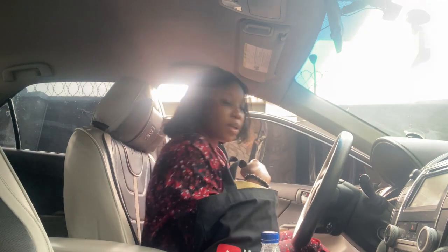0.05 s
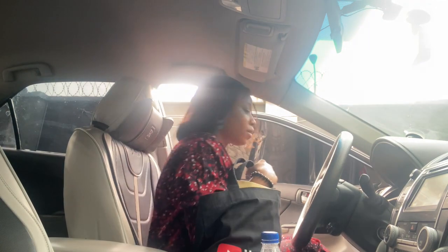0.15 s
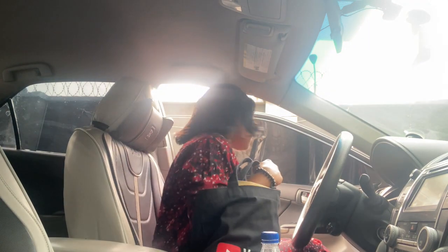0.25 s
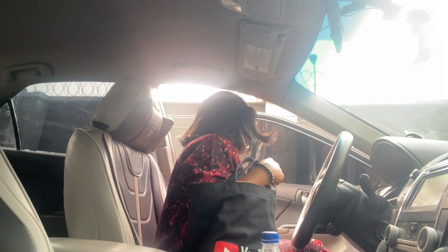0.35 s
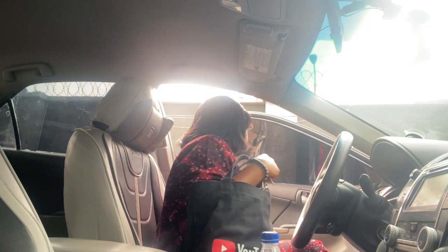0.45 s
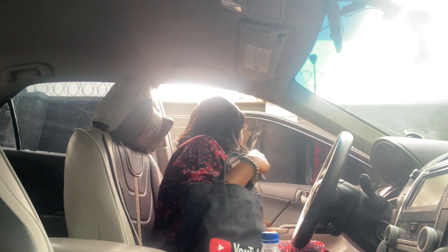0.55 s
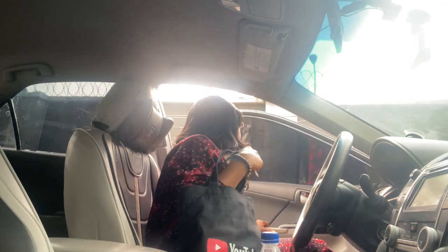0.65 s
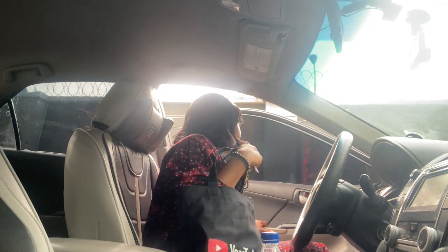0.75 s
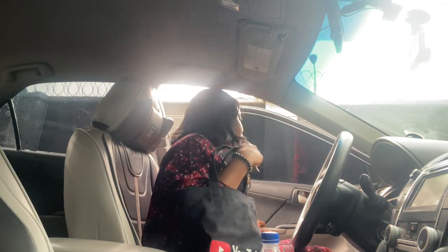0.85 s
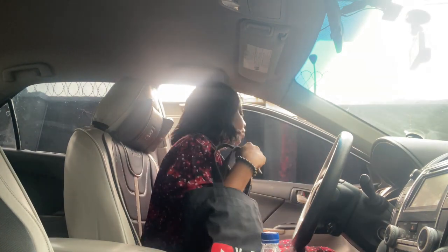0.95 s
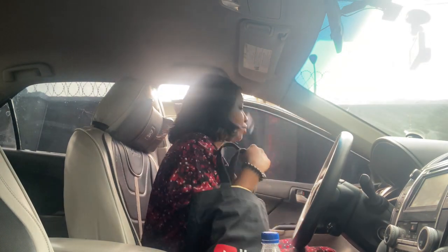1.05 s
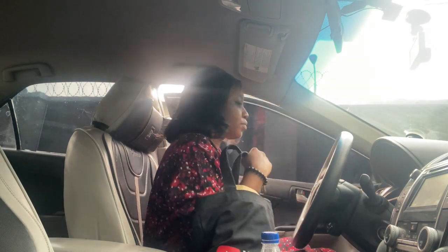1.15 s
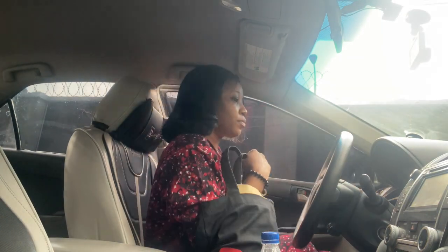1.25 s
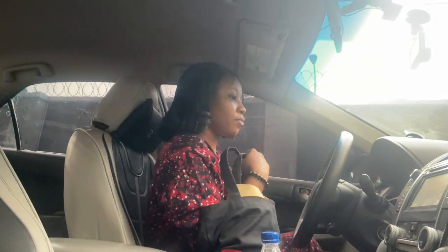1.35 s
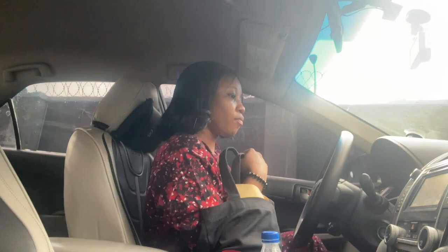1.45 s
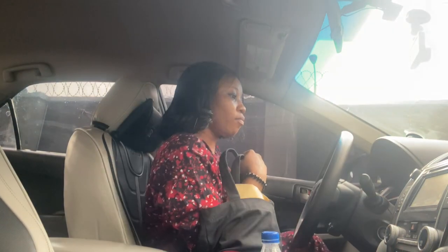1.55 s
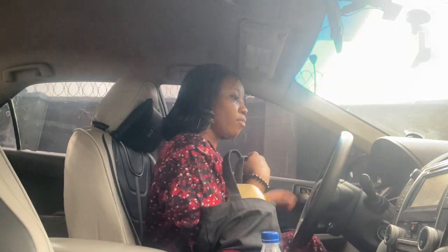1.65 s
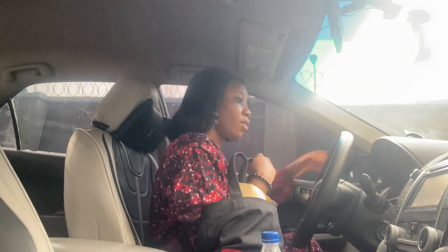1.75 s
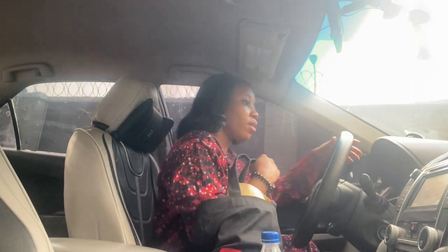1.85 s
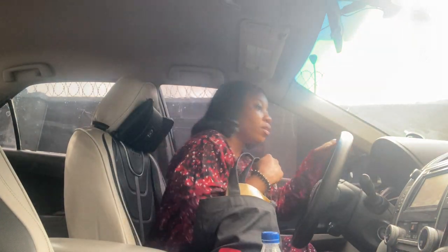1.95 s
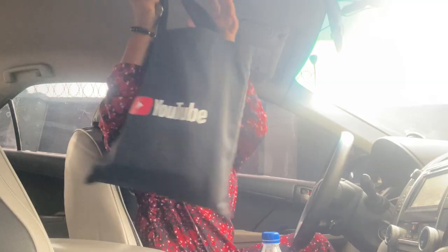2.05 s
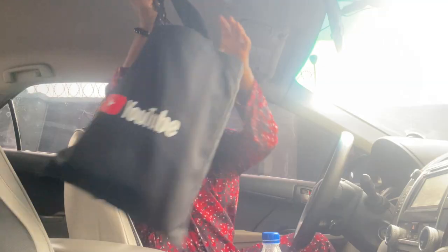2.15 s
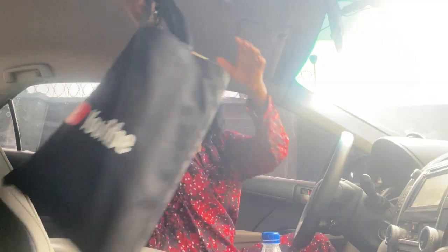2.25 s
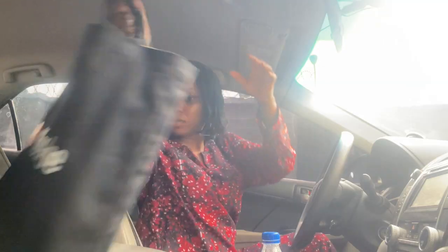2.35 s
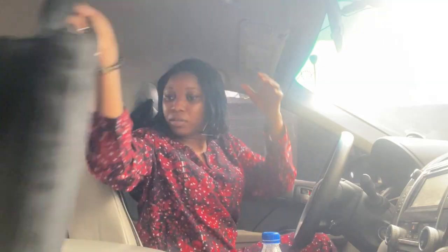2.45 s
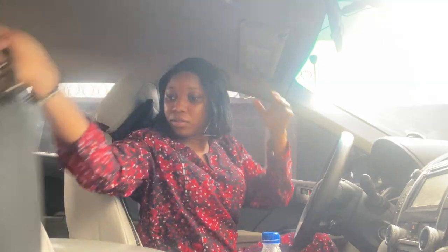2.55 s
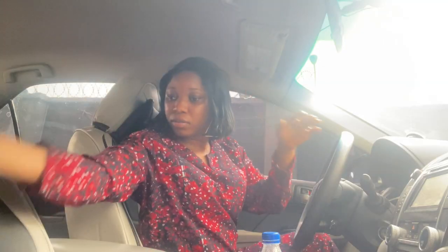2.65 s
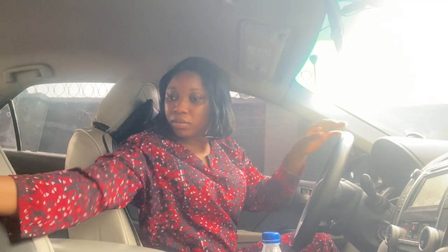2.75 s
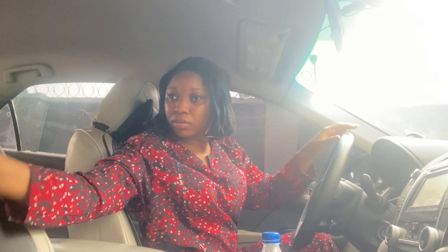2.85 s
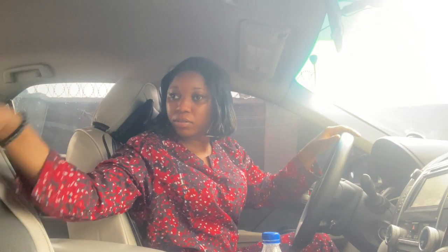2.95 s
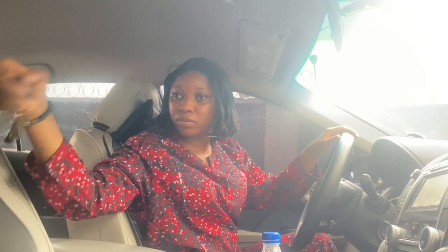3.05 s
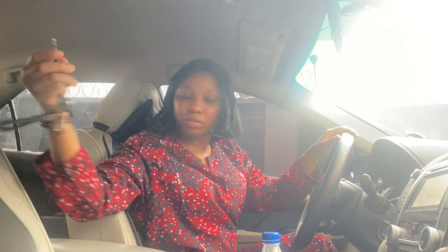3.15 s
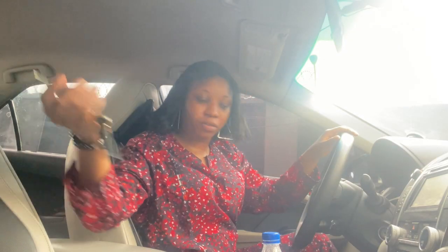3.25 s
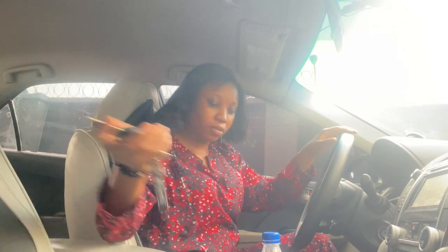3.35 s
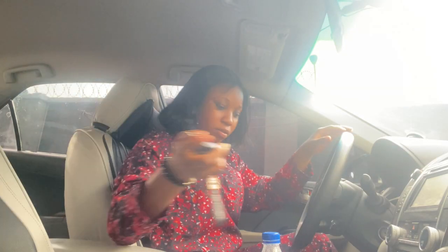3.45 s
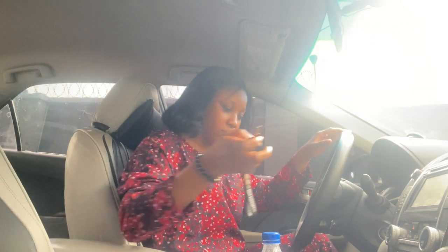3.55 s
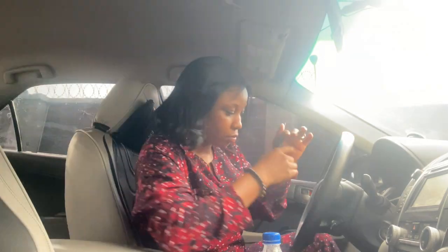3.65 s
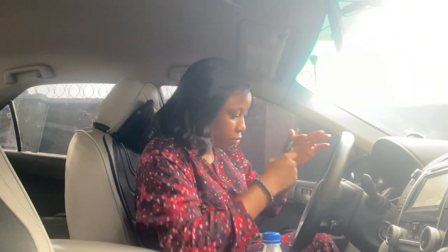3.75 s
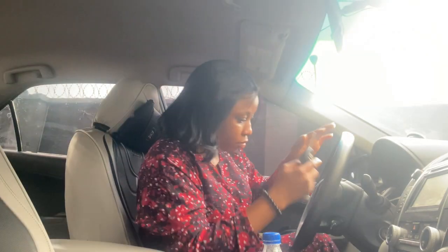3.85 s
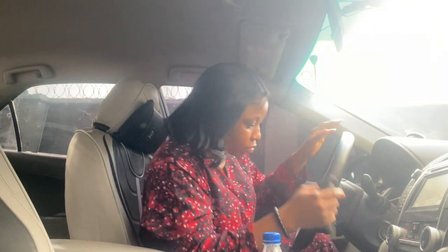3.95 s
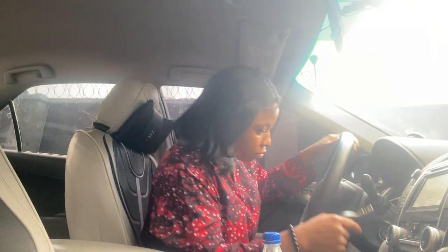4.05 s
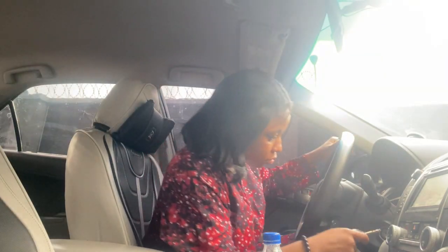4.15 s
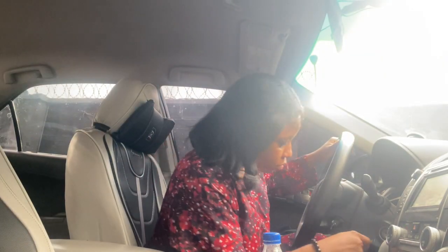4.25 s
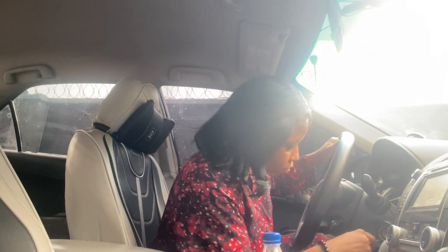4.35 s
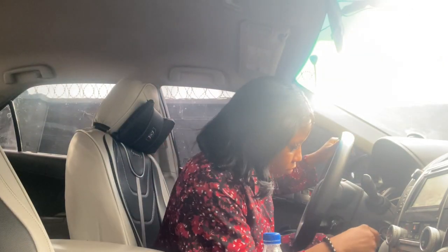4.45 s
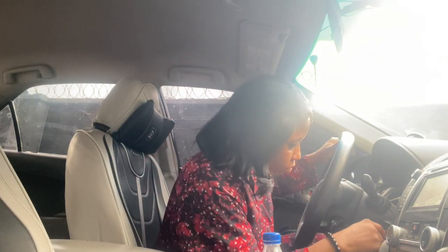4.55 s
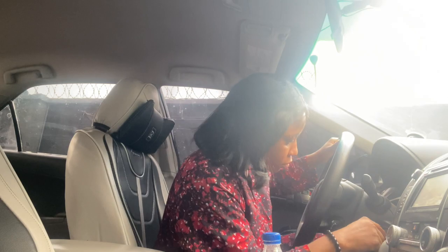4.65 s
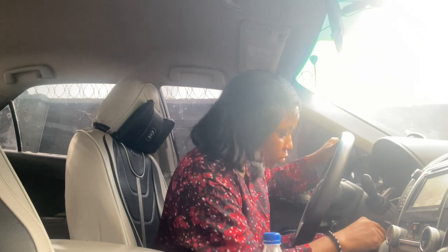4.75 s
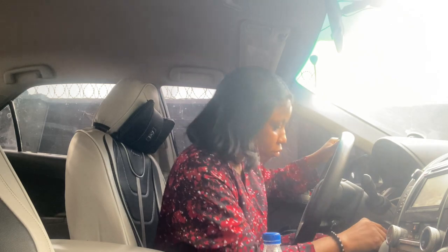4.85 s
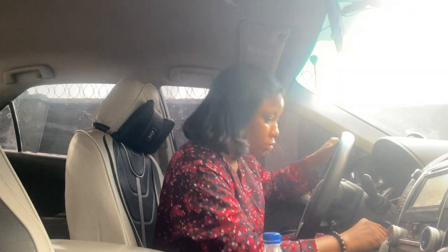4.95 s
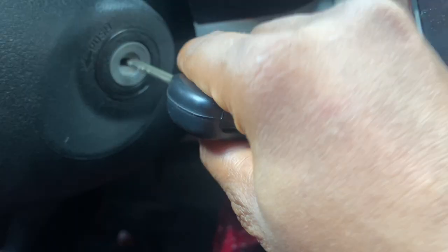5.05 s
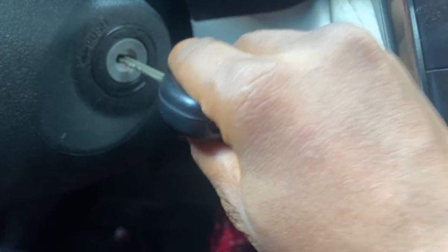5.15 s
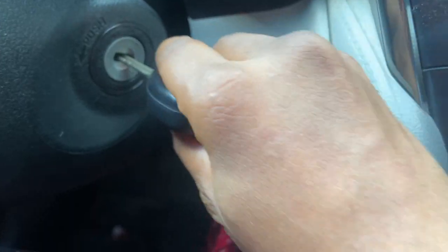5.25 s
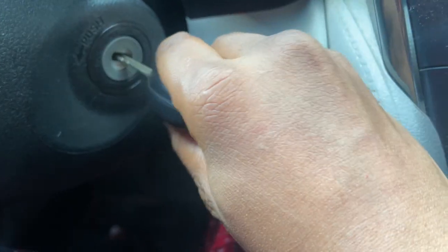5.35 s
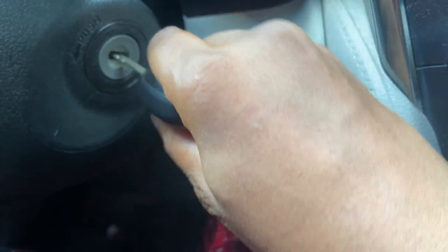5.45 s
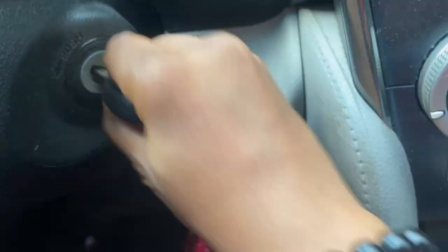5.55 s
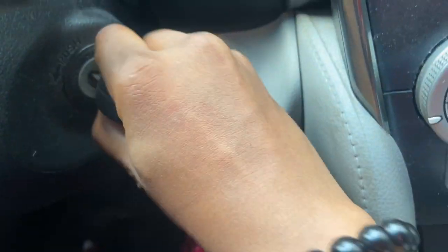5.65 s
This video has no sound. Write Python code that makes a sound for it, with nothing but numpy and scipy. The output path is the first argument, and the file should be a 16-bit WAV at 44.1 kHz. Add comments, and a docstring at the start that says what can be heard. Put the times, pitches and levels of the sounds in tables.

```python
"""Inside a parked car an engine drones from outside, multiples of its cycle over shaped noise, loud until
the door is pulled shut with blows that boom, knock and clatter, and a duller hum remains.
A bag is lifted and dropped on the seat: grains of noise for the cloth, more blows, and short noise clicks.
Then keys are fished out and jingle in the hand as dying metal modes over finer chatter, and they end in
clicks and chinks around the ignition lock. The small metal and plastic sounds get a short cabin echo."""
import sys
import numpy as np
from scipy import signal
from scipy.fft import rfft, irfft, next_fast_len
from scipy.io import wavfile

SR = 44100
rng = np.random.default_rng(int(sys.argv[2]) if len(sys.argv) > 2 else 0)


def dump_mix(stems):
    """Bounce the given channels to the path in sys.argv[1] as a 16-bit WAV at rate SR."""
    frames = np.atleast_2d(stems).T  # one column per channel
    limited = np.clip(frames, -1, 1)  # hard clip at full scale
    pcm = np.round(limited * 32767).astype(np.int16)
    wavfile.write(sys.argv[1], SR, pcm)


N = 251811
TIME_S = np.arange(N) / SR


def amp(db):
    """Decibels to gain."""
    return 10 ** (np.asarray(db) / 20)


def unit(x):
    """Scale to rms 1."""
    return x / np.sqrt(np.mean(x ** 2) + 1e-20)


def level_curve(rows, before=-200):
    """Gain over time from rows of seconds and dB, silent after the last; before=None holds the first."""
    seconds, db = np.transpose(rows)
    return amp(np.interp(TIME_S, seconds, db, left=before, right=-200))


def at_hz(points, hz):
    """Read a curve over frequency on a log-frequency axis."""
    point_hz, values = np.transpose(points)
    return np.interp(np.log(hz + 1), np.log(point_hz), values)


def colour(x, points):
    """Causal (minimum-phase) filter with the given spectrum, made by folding its cepstrum."""
    size = next_fast_len(x.shape[-1] + 8192)
    size += size % 2
    log_gain = at_hz(points, np.arange(size // 2 + 1) * SR / size) * np.log(10) / 20
    cepstrum = irfft(log_gain, size)
    cepstrum[1:size // 2] *= 2
    cepstrum[size // 2 + 1:] = 0
    return irfft(rfft(x, size) * np.exp(rfft(cepstrum)), size)[..., :x.shape[-1]]


def resonate(x, hz, q):
    """One resonance of the given sharpness."""
    return signal.lfilter(*signal.iirpeak(hz, q, fs=SR), x)


def drift(rate):
    """Random wander through this many new values a second, spread 1."""
    knots = rng.standard_normal(int(N / SR * rate) + 2)
    return np.interp(np.arange(N) * rate / SR, np.arange(len(knots)), knots)


def add(out, s, sound):
    """Mix a sound in at a time in seconds."""
    i = int(s * SR)
    out[..., i:i + sound.shape[-1]] += sound[..., :max(N - i, 0)]


def pan(db):
    """Left and right gains from the level of left over right."""
    return amp([[db / 2], [-db / 2]])


def fading(t60, swell=.0005):
    """Envelope that swells briefly and dies away by 60 dB in t60 (at least 5 ms), peak 1."""
    t60 = max(t60, .005)
    t = np.arange(int(SR * t60 * 1.2)) / SR
    shape = (1 - np.exp(-t / max(swell, 1e-4))) * amp(-60 * t / t60)
    return shape / shape.max()


# Resonances of hard plastic and fittings, a plain list of pitches in Hz.
TRIM_HZ = (1330, 1620, 2650, 4250, 4700, 6500, 7500, 8300, 10800)
TRIM_Q, TRIM_SCATTER_DB = 10, 4   # sharpness, change from hit to hit


def trim(x, db=-4):
    """Noise through the resonances of the trim, each with a new strength; db sets them before the mix."""
    peaks = sum(amp(rng.normal(0, TRIM_SCATTER_DB)) * resonate(x, hz, TRIM_Q) for hz in TRIM_HZ)
    return unit(unit(x) * amp(-6) + amp(db) * unit(peaks))


# Blows on door, seat and trim. Each row: start in seconds, boom pitch in Hz, boom level in dB,
# knock pitch in Hz, knock level in dB, clatter level in dB, t60 of the knock in seconds.
BLOWS = [(0.849, 84, -29, 598, -25, -37, 0.026), (1.313, 58, -26.5, 298, -57, -47, 0.11),
         (1.331, 81.7, -30, 830, -30.5, -36, 0.13), (1.349, 78.5, -45, 705, -30.5, -33, 0.028),
         (1.356, 79.1, -16.5, 434, -15, -30.5, 0.046), (1.372, 78.9, -9.5, 234, -26, -37.5, 0.21),
         (1.388, 77.8, -16, 428, -41, -38.5, 0.089), (1.409, 75, -41, 795, -34, -39.5, 0.11),
         (1.425, 75.1, -22, 794, -41.5, -43, 0.21), (1.468, 74.9, -16.5, 291, -35.5, -54, 0.11),
         (1.535, 88, -20, 250, -58, -74, 0.053), (2.378, 110, -54, 630, -37.5, -66, 0.24),
         (2.524, 153, -30, 594, -39, -50, 0.025), (2.56, 117, -29, 516, -29.5, -27, 0.25),
         (2.571, 147, -23, 310, -23, -27.5, 0.16), (2.589, 129.5, -10, 292, -26, -40, 0.044),
         (2.611, 74, -22, 570, -27.5, -52, 0.16), (2.645, 64.4, -18, 325, -37.5, -46.5, 0.32),
         (4.222, 115, -56, 700, -42, -55, 0.071), (4.235, 119, -38.5, 770, -31.5, -37.5, 0.074),
         (4.247, 157, -31.5, 750, -32.5, -41, 0.058), (4.263, 157, -36.5, 590, -45, -49, 0.036),
         (4.294, 90, -31, 201, -43, -75, 0.12), (4.477, 130, -49.5, 670, -39.5, -57, 0.057),
         (4.536, 132, -46, 780, -39, -48.5, 0.074), (5.076, 133, -51, 560, -35.5, -46, 0.03),
         (5.613, 106, -53, 570, -40, -52, 0.047), (5.683, 133, -42, 607, -37, -62, 0.064)]
# Partials of the cabin boom. Each row: multiple of the boom pitch, level in dB.
BOOM_PARTIALS = [(1.0, 1), (.58, -2.5), (2.0, -10)]
# How long booms last. Each row: boom pitch in Hz, t60 in seconds.
BOOM_T60 = [(60, 0.17), (85, 0.39), (130, 0.045)]
# Colour of the broad knock noise. Each row: frequency in Hz, level in dB per Hz.
KNOCK_COLOUR = [(71, -48.5), (120, -1), (269, -0.5), (333, -8), (431, -4), (625, -10.5), (705, -9),
                (849, -14.5), (1010, -7), (1100, -53), (2420, -120)]
# Colour of the clatter noise. Each row: frequency in Hz, level in dB per Hz.
CLATTER_COLOUR = [(470, -16), (800, -3.5), (847, -2), (1360, 6), (3000, -7.5), (4650, -14), (5990, -18.5),
                  (7800, -18), (8950, -22.5), (11700, -80.5)]
BOOM_SWELL_CYCLES = 0.32
KNOCK_Q, KNOCK_BROAD_DB = 2.5, -4   # the struck panel favours one pitch; the broad knock lies below it
CLATTER_LASTS = 1.14                # times as long as the knock
CLATTER_SPLIT_HZ = 2200             # above this the clatter dies twice as fast


def blows():
    """Each blow sets the cabin booming and throws a hollow knock and a clatter of noise that die away."""
    boom, knock, clatter = np.zeros(N), np.zeros((2, N)), np.zeros((2, N))
    white = rng.standard_normal((4, N))
    broad = unit(colour(white[:2], KNOCK_COLOUR))
    rattle = unit(colour(white[2:], CLATTER_COLOUR))
    for s, hz, boom_db, knock_hz, knock_db, clatter_db, t60 in BLOWS:
        i = int(s * SR)
        shape = fading(at_hz(BOOM_T60, hz), swell=BOOM_SWELL_CYCLES / hz)
        t = np.arange(len(shape)) / SR
        partials = sum(amp(db) * np.sin(2 * np.pi * k * hz * t) for k, db in BOOM_PARTIALS)
        add(boom, s, amp(boom_db) * shape * partials)

        shape = fading(t60, swell=0.0051)
        noise = broad[:, i:i + len(shape)]
        panel = unit(resonate(noise, knock_hz, KNOCK_Q))
        sound = panel + amp(KNOCK_BROAD_DB) * noise
        add(knock, s, amp(knock_db) * sound * shape[:sound.shape[1]])

        shape = fading(t60 * CLATTER_LASTS, swell=0.0025)
        sound = trim(rattle[:, i:i + len(shape)], db=-9)   # broad blows bring the trim out less
        shape = shape[:sound.shape[1]]
        dull = signal.lfilter(*signal.butter(1, CLATTER_SPLIT_HZ, fs=SR), sound)
        bright = sound - dull
        add(clatter, s, amp(clatter_db) * shape * (dull + shape * bright))
    knock *= amp(1.53 * drift(90))     # the load lands in lumps
    clatter *= amp(3 * drift(220))     # loose trim and buckles crackle unevenly
    return boom * [[1], [2.5]] + knock + clatter   # rows: centre, and the part that feeds the width


# Keys touching. Each row: start in seconds, long keys in dB, share of the second long key from 0 to 1,
# small key in dB, ring in dB, t60 in seconds.
CHINKS = [(3.155, -62, 0.9, -63, -41, 0.034), (3.649, -24, 0.01, -42, -44, 0.098),
          (3.738, -46, 0.05, -54, -48, 0.072), (3.775, -52, 0.3, -44, -50, 0.077),
          (3.83, -53, 0.98, -60, -47, 0.11), (3.845, -45, 0.85, -56, -55, 0.054),
          (3.898, -44, .9, -59, -52, 0.023), (3.92, -28.5, 0, -41, -58, 0.024),
          (3.96, -32.5, 0.3, -54, -60, 0.026), (3.995, -38, 0.8, -53, -49, 0.0085),
          (4.014, -46.5, 0.8, -56, -53, 0.02), (4.058, -49, .3, -53, -53, 0.028),
          (3.872, -55, .9, -52, -46, 0.043), (5.24, -50.5, .5, -70, -67, .02),
          (5.258, -63, .5, -72, -74, 0.012), (5.429, -44, 1, -68, -57, 0.019),
          (5.584, -40, 0.15, -38, -30, 0.11), (5.591, -43, .2, -46, -29, 0.033),
          (5.615, -42, 0.3, -60, -35, 0.017), (5.622, -25, 0, -51, -21, 0.0083),
          (5.641, -40.5, 0.1, -55, -34, 0.031), (5.659, -41, 0.14, -48, -46, 0.038),
          (5.703, -38.5, 0.3, -47, -31.5, 0.037)]
# Modes of the bunch. Each row: piece (0 and 1 long keys, 2 small key, 3 ring), pitch in Hz.
KEY_MODES = [(0, 7118), (0, 2485), (0, 11610), (1, 7205), (1, 2640), (1, 7500), (2, 6320), (1, 11640),
             (3, 11184), (3, 11212), (0, 6930)]
# How those modes ring, in the same order. Each row: level in dB, share of the touch's t60,
# further t60 of its own in seconds.
KEY_RINGS = [(3, .95, .001), (-24, .8, .01), (-27, .9, .015), (7, .88, .001), (-8, .6, .03), (-8, .4, .005),
             (-1, .47, .021), (-14, .6, .015), (-1, .5, .026), (-14, 1, .097), (-14, .4, .01)]
KEY_SWELL_SHARE = 0.14                     # swell as share of t60
CHINK_LEAN_DB, CHINK_SCATTER_DB = 1, 1.5   # left over right, and its change from touch to touch
KEY_LAG_S = 2.2e-5                         # the left side hears the keys this far ahead
STRAY_DB, STRAY_T60_S, STRAY_HZ = -13, .014, (6200, 9000)   # below the long keys, longest t60, range
KEY_JOSTLE_DB = 4                          # neighbours brushing a ringing key make it flutter


def keys():
    """Every touch rings the modes of the pieces of the bunch, each dying away at its own pace."""
    out = np.zeros((2, N))
    for s, long_db, second, small_db, ring_db, t60 in CHINKS:
        first_gain, second_gain = amp(long_db) * np.sqrt([1 - second, second])
        gains = [first_gain, second_gain, amp(small_db), amp(ring_db)]
        sides = pan(rng.normal(CHINK_LEAN_DB, CHINK_SCATTER_DB))
        modes = []
        for (piece, hz), (db, share, own) in zip(KEY_MODES, KEY_RINGS):
            scatter_db = 1.5 if db > -2 else 4   # strong modes are steadier
            modes.append((hz, gains[piece] * amp(db + rng.normal(0, scatter_db)), t60 * share + own, 0))
        for _ in range(6):   # other keys caught in passing: new pitches at every touch
            gain = amp(rng.normal(long_db + STRAY_DB, 4))
            lasts = min(t60, STRAY_T60_S) * rng.uniform(.4, 1.2)
            modes.append((rng.uniform(*STRAY_HZ), gain, lasts, rng.uniform(0, .012)))
        for hz, gain, lasts, late in modes:
            shape = fading(lasts, KEY_SWELL_SHARE * min(t60, lasts))
            t = np.arange(len(shape)) / SR + KEY_LAG_S / 2 * np.array([[1], [-1]])
            tone = np.sin(2 * np.pi * hz * t + rng.uniform(0, 2 * np.pi))
            add(out, s + late, gain * sides * shape * tone)
    return out * amp(KEY_JOSTLE_DB * drift(180))


# Loose chatter of the bunch between the clear touches, in separate spans.
# Each row of a span: time in seconds, level in dB.
CHATTER = [
    [(3.15, -58), (3.3, -58), (3.34, -95)],
    [(3.55, -58), (3.65, -69), (3.8, -54), (3.93, -49), (4.04, -68), (4.13, -74)],
    [(5.05, -65), (5.3, -80), (5.55, -73), (5.62, -51), (5.71, -68)],
]


def chatter(per_s, t60):
    """Tiny uneven touches dealt to many short metal modes."""
    hit = rng.random(N) < per_s / SR
    strength = amp(1.1 * np.minimum(rng.exponential(1, N), 4))
    taps = hit * strength * rng.choice([-1, 1], N)
    dealt = rng.integers(0, 16, N)
    out = np.zeros((2, N))
    r = amp(-60 / (t60 * SR))   # decay per sample
    for k, hz in enumerate(np.geomspace(5200, 11800, 16)):
        poles = [1, -2 * r * np.cos(2 * np.pi * hz / SR), r * r]
        ring = signal.lfilter([1], poles, taps * (dealt == k) + 1e-18)
        mode_db = at_hz([(5000, 2.5), (7300, 24), (9500, 5), (12000, -6)], hz)
        out += amp(mode_db) * pan(rng.normal(0, 2.6)) * ring
    return sum(level_curve(span) for span in CHATTER) * unit(out)


# Hard little clicks of door latch, bag fittings, fob and lock. Each row: start in seconds, level in dB,
# brightest pitch in Hz, t60 in seconds.
CLICKS = [(1.337, -39, 1490, 0.023), (1.359, -35.5, 3000, 0.031), (1.392, -51, 2430, .03),
          (2.004, -36, 5540, 0.037), (2.013, -43.5, 4380, 0.02), (2.226, -55, 6700, 0.11),
          (2.494, -49, 7650, 0.016), (2.551, -50, 7200, .03), (2.591, -51, 7500, 0.049),
          (2.649, -38.5, 6440, 0.022), (2.568, -37.5, 8500, 0.0094), (2.658, -35.5, 6060, 0.02),
          (2.929, -53, 2820, 0.018), (2.987, -29.5, 6750, 0.0058), (3.003, -38.5, 7860, 0.054),
          (3.152, -42.5, 7100, 0.07), (3.234, -48.5, 7150, 0.069), (3.274, -50, 8000, 0.058),
          (3.384, -61, 7560, .04), (3.551, -64, 7400, .08), (3.648, -51, 8000, 0.15),
          (3.708, -52.5, 7500, 0.083), (3.737, -53, 7400, 0.11), (3.87, -48.5, 6850, 0.07),
          (3.898, -50, 7450, .024), (3.92, -37.5, 8500, 0.048), (3.962, -53, 7200, 0.17),
          (3.997, -51, 9500, 0.084), (4.059, -51, 7540, 0.038), (4.115, -59.5, 7000, 0.057),
          (4.237, -56, 4300, 0.033), (4.429, -44, 4000, 0.031), (4.499, -48, 3200, 0.036),
          (4.57, -48.5, 4900, 0.032), (4.602, -45.5, 5800, 0.03), (4.712, -49, 5700, 0.044),
          (4.995, -52, 5500, 0.072), (5.0617, -34, 5900, 0.011), (5.068, -52, 4500, .02),
          (5.076, -51, 7500, 0.01), (5.1153, -36.5, 6100, 0.012), (5.132, -39.5, 4900, 0.0067),
          (5.178, -57, 6500, .01), (5.188, -54, 5760, 0.035), (5.197, -46, 7060, 0.0092),
          (5.208, -37, 3200, 0.013), (5.2077, -39.5, 7200, 0.0045), (5.385, -53.5, 2820, 0.013),
          (5.425, -47, 8200, 0.018), (5.431, -44.5, 8500, 0.0091), (5.47, -50.5, 2820, 0.016),
          (5.533, -54, 4170, 0.01), (5.592, -49, 10100, 0.042), (5.676, -45, 8000, 0.0086),
          (5.684, -45.5, 2470, 0.0047)]
# Colour of the click noise. Each row: frequency in Hz, level in dB per Hz.
CLICK_COLOUR = [(880, -21), (1500, 18), (4940, 2.5), (5610, 1.5), (8890, 4.5), (10500, -5), (12200, 1),
                (14000, -101)]
# Low tick under the duller clicks. Each row: brightest pitch of the click in Hz, tick over click in dB.
TICK = [(2500, -0.5), (5500, 2), (8000, -43)]
CLICK_RING_DB, CLICK_RING_Q = -3, 4   # each click also rings near its brightest pitch
CLICK_LEAN_DB = 0.5                   # left over right


def clicks():
    """Short bursts of noise, each leaning to its own brightest pitch, the duller ones over a low tick."""
    out = np.zeros((2, N))
    bright, other = unit(colour(rng.standard_normal((2, N)), CLICK_COLOUR))
    tick_band = signal.butter(2, [600, 1900], "band", fs=SR, output="sos")
    dull = unit(signal.sosfilt(tick_band, rng.standard_normal(N)))
    for s, db, hz, t60 in CLICKS:
        shape = fading(t60, swell=max(.0015, .06 * t60))
        i = int(s * SR)
        part = slice(i, i + len(shape))
        band = signal.butter(2, [hz / 1.8, min(hz * 1.83, .45 * SR)], "band", fs=SR)
        burst = trim(signal.lfilter(*band, bright[part]) + 0.32 * bright[part])
        burst = burst + amp(CLICK_RING_DB) * unit(resonate(bright[part], hz, CLICK_RING_Q))
        sides = 1.1 * unit(signal.lfilter(*band, other[part])) * [[1], [-1]]   # opposite left and right
        tick = amp(db + at_hz(TICK, hz)) * dull[part]
        sound = amp(db) * (burst + sides) + tick
        add(out, s, pan(CLICK_LEAN_DB) * sound * shape[:len(burst)])
    return out


# Cloth of bag and sleeve, in separate spans. Each row of a span: time in seconds, level in dB.
RUSTLE = [
    [(1.99, -78), (2.05, -52.5), (2.2, -63), (2.4, -57), (2.54, -65.5), (2.6, -29.5), (2.67, -44.5),
     (2.7, -46), (2.76, -44.5), (2.85, -72.5)],
    [(2.92, -67), (3.02, -72), (3.1, -62), (3.25, -67), (3.4, -59), (3.62, -105)],
    [(4.2, -77), (4.26, -95), (4.4, -86), (4.55, -66), (4.8, -77)],
]
# Colour of the cloth. Each row: frequency in Hz, level in dB per Hz.
CLOTH_COLOUR = [(530, -32), (900, 3), (1350, 0.5), (3440, -9), (7030, -10.5), (8680, -10.5), (10000, -28),
                (13000, -42)]


def cloth():
    """Dense uneven grains of noise in clumps."""
    grains = rng.standard_normal((2, N)) * amp(2.5 * drift(200) + 3 * drift(35))
    return sum(level_curve(span) for span in RUSTLE) * unit(colour(grains, CLOTH_COLOUR))


# Engine speed. Each row: time in seconds, engine cycles per second.
ENGINE_SPEED = [(0, 20.47), (2.9, 20.49), (4.2, 20.52), (4.6, 20.6), (5.71, 20.64)]
# Tones that stand out, a plain list of multiples of the engine cycle.
HARMONICS = (3, 5, 6, 7, 8, 12, 13, 14, 15, 16, 19, 23, 30, 32, 33, 34, 35, 42, 64, 65)
# Their levels, in the same order. Each row: door open in dB, door shut in dB.
TONE_LEVELS = [(-28, -16.5), (-23, -12.5), (-28, -15.5), (-21.5, -19), (-21.5, -16), (-6, -13.5),
               (-14.5, -17.5), (-12, -13.5), (-11, -15.5), (-33, -15), (-19, -21), (-20, -31.5),
               (-15.5, -40), (-21.5, -29), (-15, -30), (-25, -23.5), (-16.5, -15), (-17.5, -50),
               (-22, -37.5), (-23, -42)]


def engine_tones(spread, waver_db):
    """Multiples of the engine cycle, loosely in step so that it throbs; one mix for each door state."""
    cycles = np.cumsum(np.interp(TIME_S, *np.transpose(ENGINE_SPEED))) / SR + 0.003 * drift(4.48)
    out = np.zeros((2, N))
    for k, (open_db, shut_db) in zip(HARMONICS, TONE_LEVELS):
        phase = spread * rng.standard_normal()
        tone = np.cos(2 * np.pi * k * cycles + phase) * amp(waver_db * drift(4.1))
        out += np.sqrt(2) * amp([[open_db], [shut_db]]) * tone
    return out


def drone(hum_gain, hiss_gain, hum, hiss, tones, noise_db):
    """Engine tones in the centre and airborne noise in the hum band, wavering hiss above."""
    white = rng.standard_normal((4, N))
    low = amp(noise_db) * unit(colour(white[:2], hum)) + tones * [[1], [0]]
    high = unit(colour(white[2:], hiss)) * amp(0.79 * drift(14))
    return hum_gain * low + hiss_gain * high


# Noise of the drone with the door shut, low then high. Each row: frequency in Hz, level in dB per Hz.
SHUT_HUM = [(15, -61), (25, -8.5), (46, -8), (91, 0), (217, -11.5), (297, -5), (432, -15), (472, -12.5),
            (628, -13), (730, -12), (763, -16.5), (900, -32.5), (1170, -91)]
SHUT_HISS = [(520, -27), (880, -55), (946, 3), (1210, 0.5), (1840, -5), (2260, -2.5), (3570, -13),
             (4170, -5.5), (4870, -13.5), (9370, -18), (10500, -91), (13600, -100)]
# The same through the open door. Each row: frequency in Hz, level in dB per Hz.
OPEN_HUM = [(15, -65), (25, -24), (86, 0), (124, -23.5), (207, -5.5), (249, -9), (359, -11), (431, -11.5),
            (549, -6), (649, -18.5), (701, -3), (950, -22), (1240, -46.5), (2090, -120)]
OPEN_HISS = [(550, -49.5), (930, -4), (1310, -2.5), (1820, -6.5), (2270, -8), (2730, -10.5), (3370, -21),
             (4170, -12.5), (5950, -20.5), (8320, -15.5), (10500, -54.5), (13600, -57)]
# Hum through the body of the car. Each row: time in seconds, level in dB.
BODY_HUM = [(1.6, -38.5), (1.95, -39.5), (2.05, -35), (2.5, -34), (2.85, -35.5), (4.1, -35), (4.9, -34.5),
            (5.25, -38), (5.71, -37.5)]
# Sound let in by the closing door. Each row: time in seconds, level in dB.
DOOR = [(0, 0.5), (.7, -1), (1.1, -1.5), (1.25, -3), (1.335, -8.5)]
SHUT_HISS_DB = -24                       # hiss against the hum through the body
OPEN_HUM_DB, OPEN_HISS_DB = -29, -39     # where the door curve stands at 0 dB
HUM_FOLLOWS, HISS_FOLLOWS = 1, 2.05      # powers of the door curve; the treble is shut out first


def engine_outside():
    """The drone through the body of the car, plus the drone through the door until it shuts."""
    open_tones, shut_tones = engine_tones(spread=0.86, waver_db=1.5)
    hum, gap = level_curve(BODY_HUM, before=None), level_curve(DOOR)
    through_body = drone(hum, hum * amp(SHUT_HISS_DB), SHUT_HUM, SHUT_HISS, shut_tones, noise_db=-5.5)
    hum_in = amp(OPEN_HUM_DB) * gap ** HUM_FOLLOWS
    hiss_in = amp(OPEN_HISS_DB) * gap ** HISS_FOLLOWS
    through_door = drone(hum_in, hiss_in, OPEN_HUM, OPEN_HISS, open_tones, noise_db=-3.5)
    return through_body + through_door


CABIN_T60_S, CABIN_DB = 0.092, -9


def cabin(x):
    """Short padded echo without the top treble, another one for each side."""
    length = int(CABIN_T60_S * SR)
    tail = rng.standard_normal((2, length)) * fading(CABIN_T60_S, swell=0.0011)[:length]
    tail = signal.sosfilt(signal.butter(4, 10500, fs=SR, output="sos"), tail)
    tail /= np.sqrt(np.sum(tail ** 2, axis=1, keepdims=True))
    return x + amp(CABIN_DB) * signal.fftconvolve(x, tail, axes=1)[:, :N]


# Left-right difference against the centre. Each row: frequency in Hz, level in dB.
WIDTH = [(30, -1), (60, -28), (120, -22.5), (230, -6), (440, -5.5), (870, 1), (1690, 1), (3300, 0),
         (6430, -4), (12500, 0)]
# Balance of left over right. Each row: frequency in Hz, level in dB.
LEAN = [(60, -0.5), (170, 3.5), (510, 1.5), (1480, 1.5), (4310, 2.5), (12500, -1.5)]
NOTCH_HZ, NOTCH_WIDTH_HZ, NOTCH_DB = 909, 97, -11   # the centre is hollow here


def wide(mid, other, tied=0.52):
    """Left and right: their difference is partly the centre a quarter turn late, partly unrelated."""
    size = next_fast_len(N, real=True)
    hz = np.arange(size // 2 + 1) * SR / size
    mid, other = rfft(mid, size), rfft(other, size)
    side = (tied * -1j * mid + np.sqrt(1 - tied ** 2) * other) * amp(at_hz(WIDTH, hz))
    mid = mid * amp(NOTCH_DB * np.exp(-((hz - NOTCH_HZ) / NOTCH_WIDTH_HZ) ** 2))
    lean = amp(at_hz(LEAN, hz) / 2)
    return irfft(np.array([(mid + side) * lean, (mid - side) / lean]), size)[:, :N]


DIP_S, DIP_WIDTH_S, DIP_DB = 2.855, .007, -14   # drone, blows and cloth dip briefly


def scene():
    """Blows, cloth and the engine outside spread wide; keys and clicks with the cabin echo."""
    dip = amp(DIP_DB * np.exp(-((TIME_S - DIP_S) / DIP_WIDTH_S) ** 2))
    mid, other = engine_outside() + blows() + cloth()
    small_sounds = clicks() + keys() + chatter(per_s=1600, t60=0.032)
    return dip * wide(mid, other) + cabin(small_sounds)


CUTOFF_HZ = 13100


def record(dry):
    """A steep elliptic low-pass cuts the top."""
    return signal.sosfilt(signal.ellip(10, .5, 80, CUTOFF_HZ, fs=SR, output="sos"), dry)


dry = scene()
out = record(dry)
dump_mix(out)
```